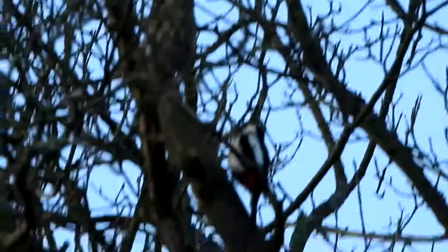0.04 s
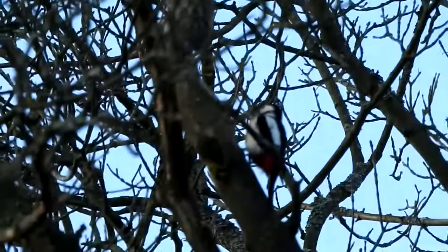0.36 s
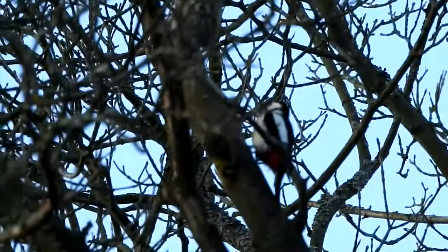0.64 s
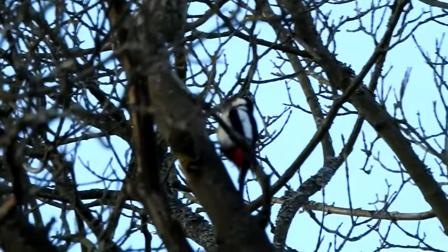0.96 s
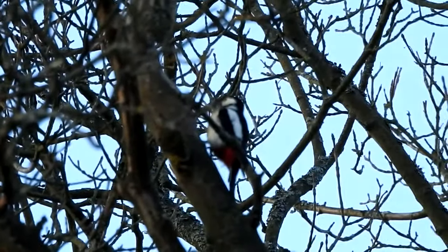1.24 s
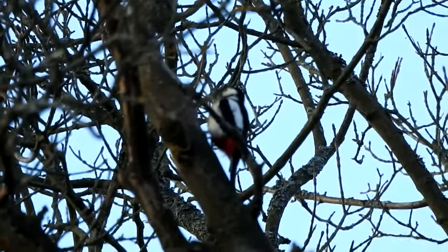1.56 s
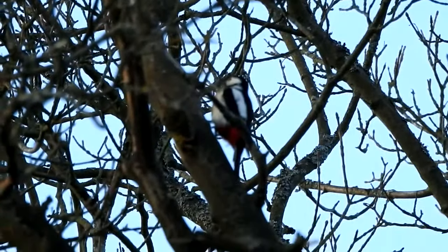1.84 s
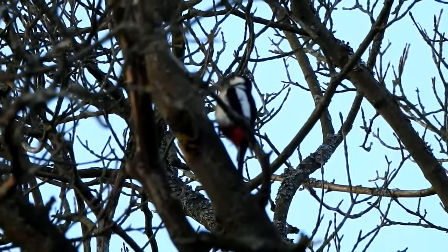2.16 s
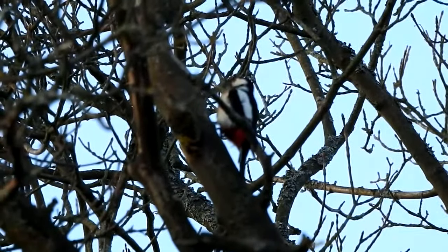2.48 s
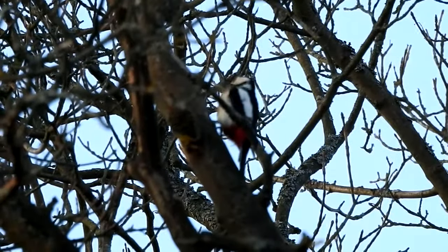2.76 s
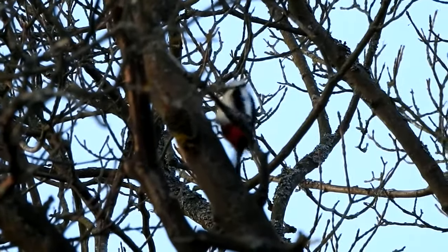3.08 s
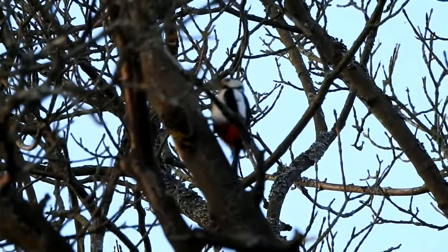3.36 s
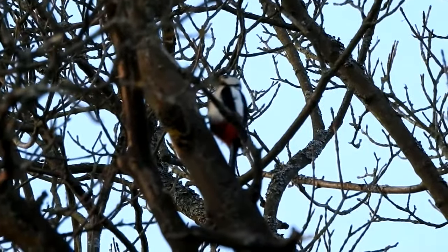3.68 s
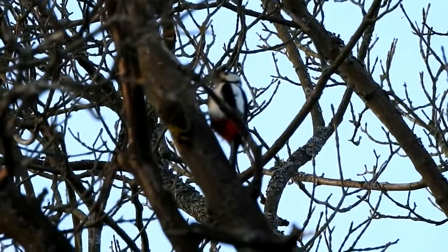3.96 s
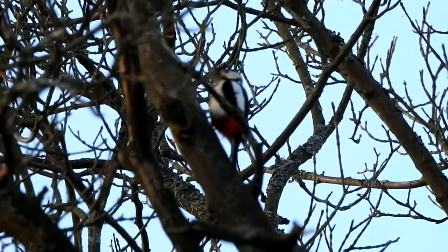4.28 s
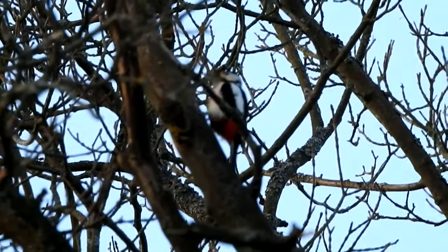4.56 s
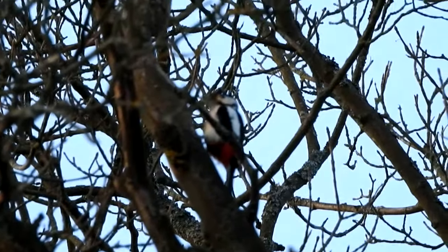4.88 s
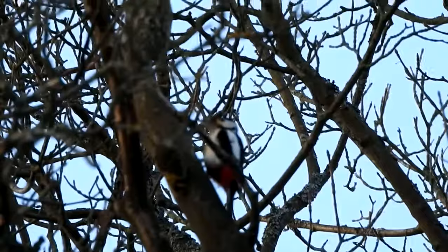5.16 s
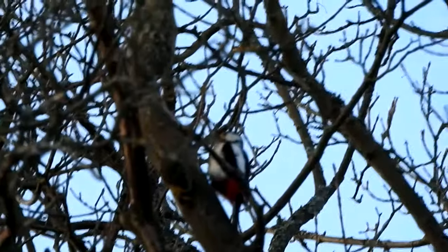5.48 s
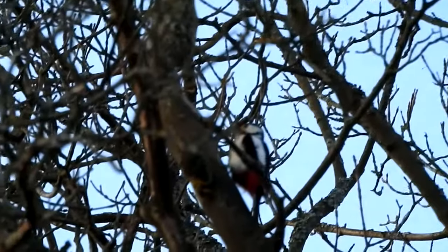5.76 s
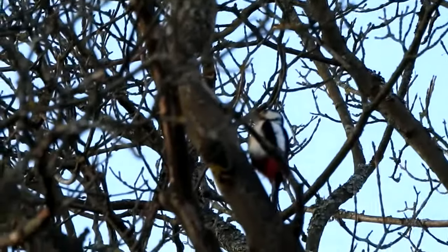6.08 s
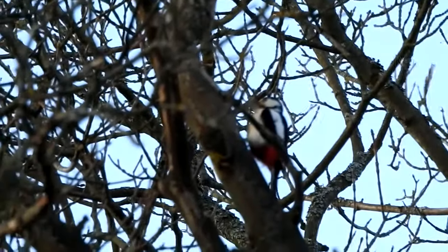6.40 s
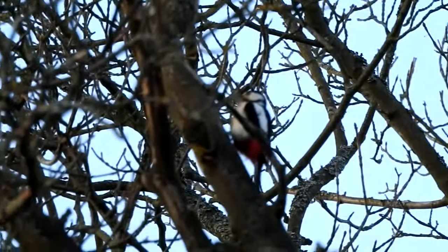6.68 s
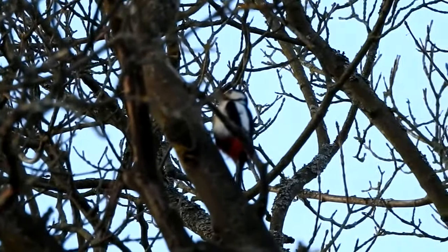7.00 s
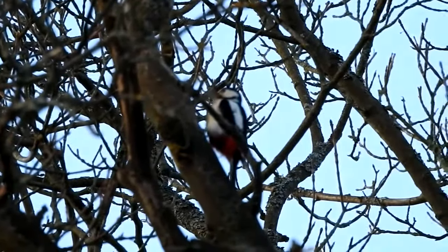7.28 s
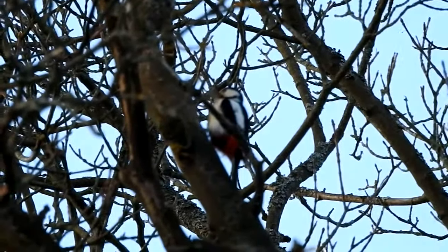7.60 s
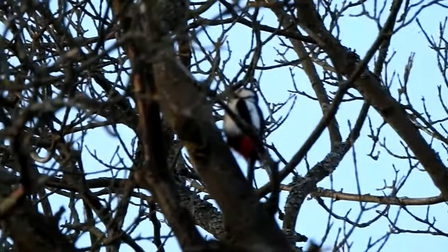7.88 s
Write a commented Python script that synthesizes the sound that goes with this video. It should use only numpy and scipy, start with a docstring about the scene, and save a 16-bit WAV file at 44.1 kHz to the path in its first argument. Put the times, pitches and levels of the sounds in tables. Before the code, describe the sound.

A quiet wood with a steady, soft rumble, hiss and very faint hum. During the first two seconds distant birds chirp, trill and twitter, and a twig gives two dry ticks at about 1 second. Faint high rustles come and go, and there is a soft, dull bump near 2 seconds. At 3 seconds a woodpecker drums one roll of seven quick knocks on a limb, lasting half a second; it is the loudest sound and echoes through the trees. A few far calls follow. From about 4.5 to 6 seconds a tit sings a high, rhythmic two-note song that swells and rises slightly, with another dull bump near its end. A distant thrush warbles short swooping phrases from 5.5 to 7.5 seconds. At about 6.3 seconds another bird gives one high, buzzy whistle, and faint twitter thins out toward 8 seconds.

```python
"""A woodpecker drums one short roll on a dead limb in a bare wood. Each stroke rings the limb's modes
and returns from the ground, trunks and branches. A tit sings a rising two-note song, a far thrush
warbles, another bird answers with one long buzzy whistle; each voice is a modulated sine plus echo.
Underneath: far calls and twitter, twig ticks and rustles, two dull bumps, rumble, hum and hiss."""
import sys
import numpy as np
from scipy import signal
from scipy.fft import rfft, irfft, next_fast_len
from scipy.io import wavfile

SR = 44100
rng = np.random.default_rng(int(sys.argv[2]) if len(sys.argv) > 2 else 0)


def persist_wave(psi):
    """Save psi, clipped to +-1, as 16-bit WAV."""
    counts = np.round(np.clip(psi, -1, 1) * 32767).astype(np.int16)
    wavfile.write(sys.argv[1], SR, np.atleast_2d(counts).T)


N = 354563
TIME_S = np.arange(N) / SR

# rumble and hiss: freq_hz, relative_db
AIR_SPECTRUM = [(25, -35), (32, -26), (39, -13), (52, 3.5), (72, -3.5), (130, -2), (280, -1), (420, -7),
                (950, -8.5), (1090, -6.5), (1400, -9.5), (3300, -12), (4200, -14.5), (6300, -14.5),
                (8000, -20), (15500, -30.5)]
# left-right likeness of the air: freq_hz, correlation
AIR_CORRELATION = [(60, 0.7), (130, 0.75), (290, 0.69), (640, 0.66), (1410, 0.47), (3100, 0.28),
                   (6820, 0.072), (15000, 0.16)]
# hum lines: freq_hz, level_db
HUM_LINES = [(51, -64), (100, -70.5), (299, -66.5)]
# note contours by name: length_share, pitch_ratio, relative_db
NOTE_SHAPES = { "rise": [(0, .93, 1), (.25, .96, 3.5), (.7, 1.01, 0.5), (1, 1.04, -14)],
               "swell": [(0, .97, -14), (.3, .98, -3.5), (.6, 1.0, 0.5), (.85, 1.015, -2.5),
               (1.05, 1.02, -26)], "dip": [(0, 1.025, -10), (.25, 1.02, -7.5), (.6, .998, 4),
               (.8, .98, -1.5), (1.1, 1.0, -8)], "slur": [(0, 1.06, -3), (.3, 0.94, 2), (.65, .98, -1.5),
               (1, 0.87, -2.5)], "arch": [(0, .96, -14), (.3, 1.02, -3.5), (.55, 1.05, -9), (.78, 1.0, 4),
               (1, .91, -7)], "flat": [(0, .985, 0), (.5, 1, -0.5), (1, 1.015, -2)],
               "fall": [(0, 1.1, -1.5), (.3, .99, 1.5), (.7, .91, -8), (1, .85, -11)],
               "swoop": [(0, 1.1, -2.5), (.13, .98, 0), (.35, .86, -4), (.5, 1.02, -0.5), (.61, 1.25, -5),
               (.7, 1.24, -4.5), (.8, 1.09, 3), (1, .89, -4)]}
# one far bird's chirps: start_s, level_db
FAR_CHIRPS = [(.028, -53.5), (.207, -53.5), (.383, -51.5), (.491, -53.5), (1.294, -58), (1.392, -54)]
# single far calls: start_s, length_s, pitch_hz, level_db, shape
SINGLE_CALLS = [(2.24, 0.064, 3010, -56, "rise"), (3.77, .15, 3070, -56, "arch"),
                (3.98, .05, 3110, -58, "slur"), (4.383, .11, 2850, -58, "slur"),
                (4.56, .088, 2740, -59.5, "slur"), (4.76, 0.228, 2150, -60.5, "flat"),
                (5.12, 0.042, 2780, -56.5, "slur"), (6.921, .4, 1558, -62, "flat")]
# far trills: start_s, note_count, step_s, pitch_hz, level_db
FAR_TRILLS = [(1.475, 8, .08, 4540, -55.5), (6.871, 4.3, .1, 4440, -59.5)]
# dry ticks: start_s, level_db
TWIG_TICKS = [(1.0233, -37), (1.1473, -45), (6.139, -44)]
# high rustles: start_s, length_s, level_db
TWIG_RUSTLES = [(0.621, .36, -62.5), (1.627, 0.26, -58), (2.628, 0.21, -59), (3.673, 0.13, -59),
                (7.675, 0.12, -59)]
# very far twitter: start_s, end_s, note_count, pitch_hz, level_db
TWITTER_RUNS = [(0.622, 1.702, 24, 3440, -68), (.62, .95, 12, 4600, -67.5), (.85, 1.2, 8, 1900, -68),
                (.7, 2.2, 18, 2500, -67), (6.35, 7.297, 18, 3600, -69)]
# dull thuds: start_s, pitch_hz, peak_db
LOW_BUMPS = [(2.14, 236.3, -51), (5.75, 56.6, -48)]
# beak strokes: start_s, strength_db, hard_share
BEAK_STROKES = [(3.0268, -4, 1), (3.1319, -10, 0.17), (3.2026, 2.5, 0.72), (3.2705, 1, 0.94),
                (3.3348, 1, 0.91), (3.3962, -0.5, 1), (3.4623, -9.5, 0.7)]
# limb modes: freq_hz, t60_s, direct_db, ground_db
LIMB_MODES = [(244, 0.24, -56, -44), (352.2, 0.32, -52.5, -49), (437.4, 0.25, -49.5, -39.5),
              (760, 0.093, -43, -31.5), (1011, 0.017, -7, -5), (1230, 0.0081, -9, -7.5),
              (1887, 0.055, -34, -23.5), (2497, 0.023, -28.5, -31.5), (3050, .01, -18.5, -35),
              (3604, 0.072, -39.5, -39), (4800, 0.012, -32, -42), (5620, 0.013, -35.5, -34.5),
              (6430, 0.01, -39, -24.5)]
# single trunk echoes: delay_s, gain_db
TRUNK_ECHOES = [(.0040, -11.5), (.0099, -24), (0.0126, -16), (.0151, -14), (0.0185, -8), (0.0265, -15.5),
                (0.0287, -7.5), (0.0319, -16), (.0332, -9.5), (0.0594, -16), (0.0639, -17.5)]
# scatter off branches: freq_hz, relative_db
BRANCH_SPECTRUM = [(120, -33), (220, -29), (440, -12), (540, -14.5), (780, -2.5), (1020, -29), (1300, -6.5),
                   (1520, -10.5), (1900, -11), (3100, -12.5), (4000, -28), (5000, -30.5), (6600, -30),
                   (8500, -39)]
# long echo from deep in the wood: freq_hz, relative_db
DEEP_WOOD_SPECTRUM = [(150, -30), (300, -15), (480, -25), (630, -2), (800, -7), (1020, 2), (1430, -3.5),
                      (1650, -10.5), (2500, -16.5), (4000, -27.5), (6500, -23.5), (9000, -56)]
# quick scatter off near twigs: freq_hz, relative_db
TWIG_SPECTRUM = [(1400, -26), (1850, 6), (2150, -6), (2450, 0), (2750, -16), (3100, -5), (3600, -11),
                 (4100, -20.5), (6600, -18.5), (8000, -35)]
# thrush phrases: start_s, length_s, level_db, shape
THRUSH_NOTES = [(5.495, .28, -54, "swoop"), (6.114, 0.28, -50, "swoop"), (6.731, .11, -49, "fall"),
                (7.189, 0.29, -53.5, "swoop")]


def from_db(db):
    """Decibels to gain."""
    return 10 ** (np.asarray(db) / 20)


def unit_rms(x):
    """Scale to rms 1."""
    return x / np.sqrt(np.mean(x ** 2) + 1e-20)


def add(out, start_s, sound):
    """Mix a sound in at start_s."""
    at = max(round(start_s * SR), 0)
    part = sound[..., :max(N - at, 0)]
    out[..., at:at + part.shape[-1]] += part


def at_hz(table, hz):
    """Read a table on a log-frequency axis."""
    freq_hz, value = np.transpose(table)
    return np.interp(np.log(hz + 1), np.log(freq_hz), value)


def band(x, low_hz, high_hz):
    """Second-order band-pass."""
    return signal.sosfilt(signal.butter(2, [low_hz, high_hz], "band", fs=SR, output="sos"), x)


def wander(size, rate_hz):
    """Slow random curve, spread near 1."""
    return np.interp(np.arange(size) / SR * rate_hz, np.arange(4096), rng.standard_normal(4096))


def stereo_noise(size, spectrum, correlation):
    """Coloured, partly correlated noise, rms 1."""
    hz = np.fft.rfftfreq(size, 1 / SR)
    mid, side = rfft(rng.standard_normal((2, size)))
    alike = np.clip(at_hz(correlation, hz), 0, 1)
    pair = np.sqrt(1 + alike) * mid + np.sqrt(1 - alike) * side * [[1], [-1]]
    return unit_rms(irfft(pair * from_db(at_hz(spectrum, hz)), size))


def air(noise_db=-53, drift_db=0.1):
    """Distant rumble and hiss, faint wavering hum."""
    noise = from_db(noise_db) * stereo_noise(next_fast_len(N), AIR_SPECTRUM, AIR_CORRELATION)[:, :N]
    hum = sum(np.sqrt(2) * from_db(db) * np.sin(2 * np.pi * hz * TIME_S + 0.79 * wander(N, 8.6))
              for hz, db in HUM_LINES)
    return noise * from_db(drift_db * wander(N, 3.2)) + hum


def shaped(notes):
    """Notes (start_s, length_s, pitch_hz, level_db, shape) to contours."""
    return [[(start_s + share * length_s, hz * ratio, db + relative_db)
             for share, ratio, relative_db in NOTE_SHAPES[shape]]
            for start_s, length_s, hz, db, shape in notes]


def syrinx(contours, buzz_hz, swing_hz, throb, waver):
    """A sine along each contour (time_s, pitch_hz, level_db); a buzz swings pitch and amplitude."""
    out = np.zeros(N)
    for contour in contours:
        time_s, hz, db = np.transpose(contour)
        t = np.arange(time_s[0], time_s[-1], 1 / SR)
        buzz_rate_hz = buzz_hz * (1 + 0.036 * wander(len(t), 54))
        buzz = np.sin(2 * np.pi * np.cumsum(buzz_rate_hz) / SR)
        pitch_hz = np.interp(t, time_s, hz) * (1 + waver * wander(len(t), 245.5)) + swing_hz * buzz
        edges = np.clip(np.minimum(t - t[0], t[-1] - t) / 0.0032, 0, 1)
        envelope = np.sqrt(2) * from_db(np.interp(t, time_s, db)) * edges * (1 + throb * buzz)
        add(out, time_s[0], envelope * np.sin(2 * np.pi * np.cumsum(pitch_hz) / SR))
    return out


def scatter(spectrum, correlation, t60_s, onset_s):
    """Dense small echoes that build and decay; energy 1."""
    t = TIME_S[:SR]
    build = 1 - np.exp(-(t / onset_s) ** 2)
    tail = stereo_noise(SR, spectrum, correlation) * from_db(-60 * t / t60_s) * build
    return unit_rms(tail) / np.sqrt(SR)


def through_wood(sound, wet_db, t60_s, pan_db):
    """Direct path plus branch echoes; positive pan_db is left."""
    tail = scatter([(1000, 0), (8000, 0)], [(2000, 0.64), (6000, 0.23)], t60_s, onset_s=0.0018)
    echo = signal.fftconvolve(sound[None], tail, axes=1)[:, :N]
    wet = from_db(wet_db)
    return (sound + wet * echo) / np.hypot(1, wet) * from_db([[pan_db / 2], [-pan_db / 2]])


def far_birds(chirp_s=0.0498, chirp_hz=2530, trill_note_s=0.045):
    """Arched chirps, single calls, hoarse trills that swell and fade."""
    chirps = [(start_s, chirp_s, chirp_hz, db, "arch") for start_s, db in FAR_CHIRPS]
    calls = syrinx(shaped(chirps + SINGLE_CALLS), buzz_hz=91.9, swing_hz=55, throb=0.15, waver=0.023)
    notes = [(start_s + k * step_s, trill_note_s, hz, db - 7 * (2 * k / count - 1) ** 2, "rise")
             for start_s, count, step_s, hz, db in FAR_TRILLS for k in range(round(count))]
    trills = syrinx(shaped(notes), buzz_hz=208, swing_hz=382, throb=0.23, waver=0.0594)
    return (through_wood(calls, wet_db=-4, t60_s=0.37, pan_db=-2)
            + through_wood(trills, wet_db=0.5, t60_s=0.62, pan_db=-0.5))


def twigs(tick_t60_s=0.028, tick_hz=(5300, 6900), rustle_hz=(5120, 6400)):
    """Near ticks and rustles: bursts and swells of high noise."""
    out, t = np.zeros(N), TIME_S[:SR // 20]
    for start_s, db in TWIG_TICKS:
        burst = rng.standard_normal(len(t)) * from_db(-60 * t / tick_t60_s)
        tick = band(band(burst, *tick_hz), *tick_hz)
        add(out, start_s, from_db(db) * tick / np.abs(tick).max())
    for start_s, length_s, db in TWIG_RUSTLES:
        size = round(length_s * SR)
        rustle = unit_rms(band(rng.standard_normal(size), *rustle_hz))
        add(out, start_s, from_db(db) * np.hanning(size) * rustle)
    return through_wood(out, wet_db=-6.5, t60_s=0.64, pan_db=0.1)


def twitter(note_s=0.05):
    """Very far birds: loose runs of short notes, mostly echo."""
    notes = []
    for start_s, end_s, count, hz, db in TWITTER_RUNS:
        for k, (slip, detune, accent) in enumerate(rng.uniform(-1, 1, (round(count), 3))):
            onset_s = start_s + (end_s - start_s) * (k + (slip + 1) / 2) / count
            notes.append((onset_s, note_s, hz * (1 + 0.05 * detune), db + 2 * accent, "slur"))
    song = syrinx(shaped(notes), buzz_hz=120, swing_hz=50, throb=0.2, waver=0.011)
    return through_wood(song, wet_db=3, t60_s=0.26, pan_db=0)


def bumps(length_s=0.1):
    """Near dull thuds: windowed low sines with unsteady phase."""
    out, t = np.zeros(N), TIME_S[:round(length_s * SR)]
    for start_s, hz, db in LOW_BUMPS:
        tone = np.sin(2 * np.pi * hz * t + wander(len(t), 64))
        add(out, start_s, from_db(db) * np.hanning(len(t)) * tone)
    return out


def limb_knock(levels_db, contact_s=0.00051):
    """Modes ring after one blow, neighbours in opposite phase; beak contact rounds the attack."""
    t = TIME_S[:SR // 4]
    modes = sum((-1) ** k * from_db(db - 60 * t / t60_s) * np.sin(2 * np.pi * hz * t)
                for k, ((hz, t60_s, *_), db) in enumerate(zip(LIMB_MODES, levels_db)))
    return modes * (1 - np.exp(-t / contact_s))


def knock_paths(ground_delay_s=0.00815):
    """One knock: direct, off the ground, off trunks, scattered through the wood."""
    direct, ground = (limb_knock(levels_db) for levels_db in np.transpose(LIMB_MODES)[2:])
    paths = np.zeros((2, N))
    add(paths, 0, direct)
    add(paths, ground_delay_s, ground)
    for delay_s, db in TRUNK_ECHOES:
        add(paths, delay_s, from_db(db) * band(direct, 450, 1250))
    correlation = [(1000, 0.98), (6000, 0.65)]
    add(paths, 0.001, from_db(-1) * scatter(BRANCH_SPECTRUM, correlation, t60_s=0.25, onset_s=0.0063))
    add(paths, 0.02, from_db(-3) * scatter(DEEP_WOOD_SPECTRUM, correlation, t60_s=0.77, onset_s=0.0068))
    add(paths, 0.009, from_db(-3.5) * scatter(TWIG_SPECTRUM, correlation, t60_s=0.071, onset_s=0.0014))
    return paths[:, :SR]


def woodpecker(soft_hz=(840, 1350), air_cutoff_hz=7600, lean_right=0.17):
    """Beak strokes drive the limb; soft contact wakes mostly its main ring, distance dulls the top."""
    hard, soft = np.zeros((2, N))
    for start_s, db, hard_share in BEAK_STROKES:
        add(hard, start_s, from_db([db]) * hard_share)
        add(soft, start_s, from_db([db]) * (1 - hard_share))
    blows = hard + band(soft, *soft_hz)
    roll = signal.fftconvolve(blows[None], knock_paths(), axes=1)[:, :N]
    roll = signal.sosfilt(signal.butter(4, air_cutoff_hz, fs=SR, output="sos"), roll)
    upper_ring = band(roll, 1030, 1450)
    return roll + lean_right * upper_ring * [[-1], [1]]


def tit_notes(start_s, pitch_hz, climb_hz_per_s, full_db, stretch, shape, count):
    """One note repeated, each higher and longer; swells to full voice, then eases."""
    period_s, swell_s, swell_db = 0.1895, 0.93, 20.5
    t = period_s * np.arange(count)
    levels_db = full_db - swell_db * (1 - t / swell_s) ** 2
    lengths_s = stretch * (0.054 + 0.0198 * t)
    return shaped(zip(start_s + t, lengths_s, pitch_hz + climb_hz_per_s * t, levels_db, [shape] * count))


def tit():
    """High and low notes in turn; the low ones buzz wider."""
    low = tit_notes(start_s=4.661, pitch_hz=4500, climb_hz_per_s=500, full_db=-35,
                    stretch=1.02, shape="swell", count=7)
    high = tit_notes(start_s=4.569, pitch_hz=5768, climb_hz_per_s=355, full_db=-39,
                     stretch=1, shape="dip", count=8)
    song = (syrinx(low, buzz_hz=169.2, swing_hz=232, throb=0.36, waver=0.016)
            + syrinx(high, buzz_hz=164.4, swing_hz=140, throb=0.16, waver=0.0113))
    return through_wood(song, wet_db=1, t60_s=0.36, pan_db=1)


def thrush(pitch_hz=2211):
    """Slow swoops with a flutter."""
    notes = [(start_s, length_s, pitch_hz, db, shape) for start_s, length_s, db, shape in THRUSH_NOTES]
    song = syrinx(shaped(notes), buzz_hz=75.5, swing_hz=69.4, throb=0.48, waver=0.0117)
    return through_wood(song, wet_db=-6, t60_s=0.32, pan_db=-3)


def whistler(start_s=6.303, length_s=0.44, pitch_hz=5010, level_db=-36.7):
    """One note slides to pitch, holds, then tires; a fast buzz adds a line just above it."""
    slide_hz, slide_s, sag_hz = 170, 0.0272, 124.4
    attack_db, attack_s, fade_db = 15, 0.025, 7
    t = np.linspace(0, length_s, 60)
    tiring = (t / length_s) ** 4
    hz = pitch_hz + slide_hz * np.exp(-t / slide_s) - sag_hz * tiring
    db = level_db - attack_db * np.exp(-t / attack_s) - fade_db * tiring
    contour = np.transpose([start_s + t, hz, db])
    song = syrinx([contour], buzz_hz=416, swing_hz=136, throb=0.23, waver=0.0049)
    return through_wood(song, wet_db=-3.5, t60_s=0.59, pan_db=-1.5)


def scene():
    """Stereo sum of all sources."""
    return woodpecker() + tit() + whistler() + thrush() + far_birds() + twitter() + twigs() + bumps() + air()


def record(dry):
    """Steep low-pass."""
    cutoff_hz = 15750
    return signal.sosfilt(signal.ellip(10, 0.1, 80, cutoff_hz, fs=SR, output="sos"), dry)


dry = scene()
out = record(dry)
persist_wave(out)
```